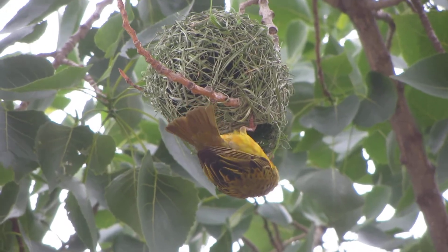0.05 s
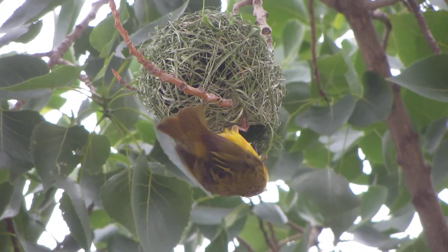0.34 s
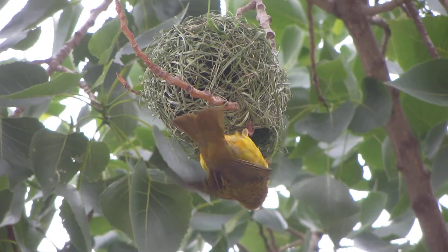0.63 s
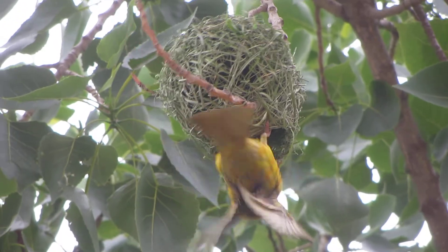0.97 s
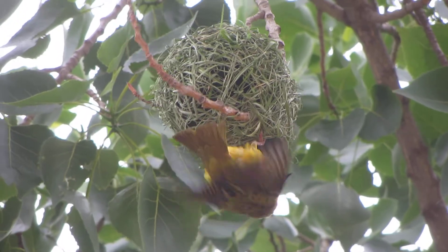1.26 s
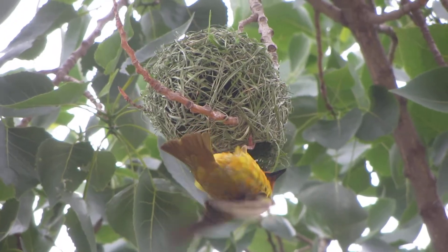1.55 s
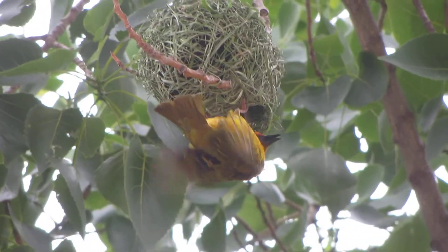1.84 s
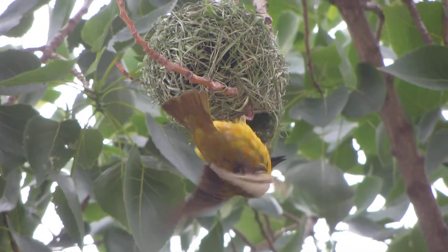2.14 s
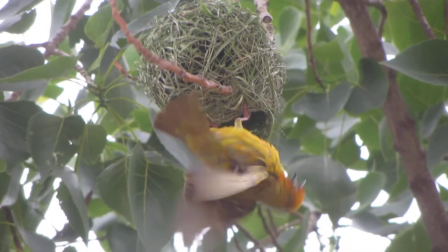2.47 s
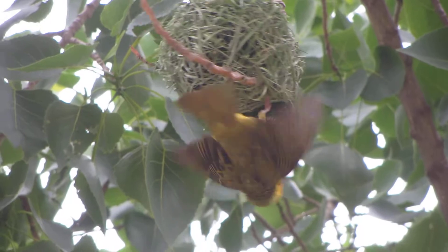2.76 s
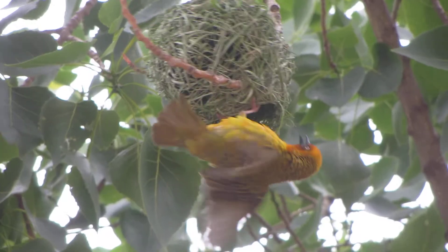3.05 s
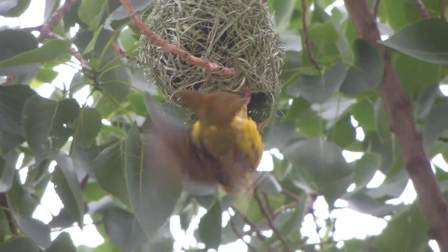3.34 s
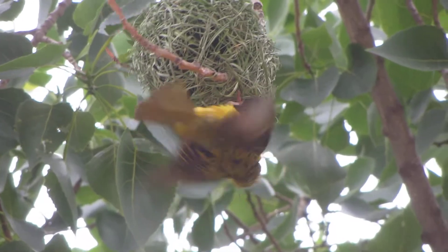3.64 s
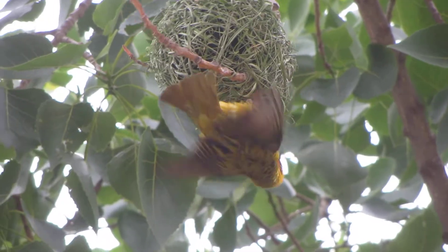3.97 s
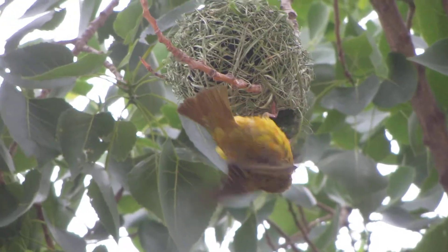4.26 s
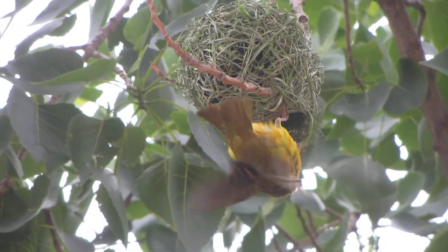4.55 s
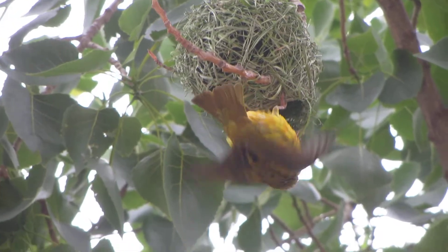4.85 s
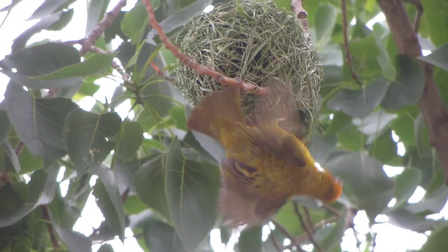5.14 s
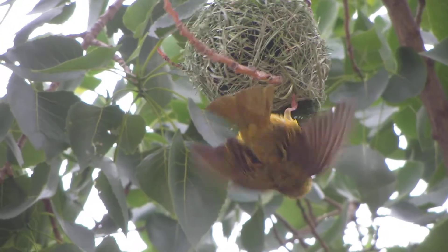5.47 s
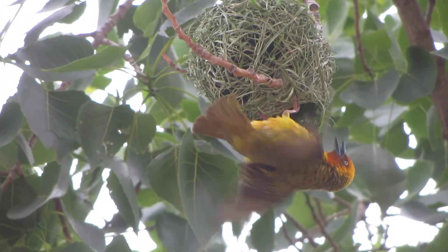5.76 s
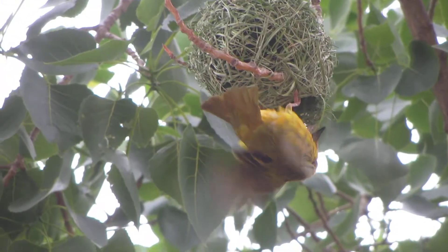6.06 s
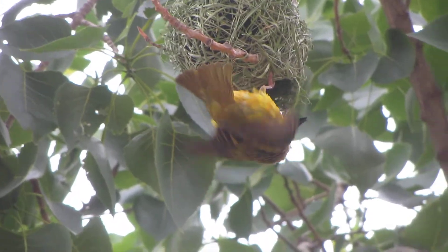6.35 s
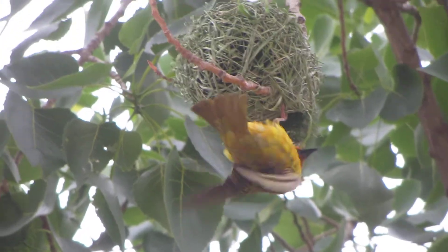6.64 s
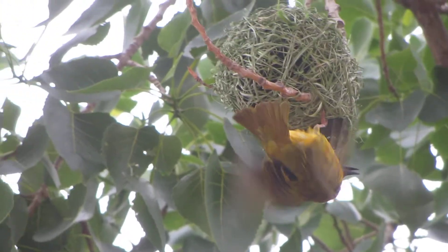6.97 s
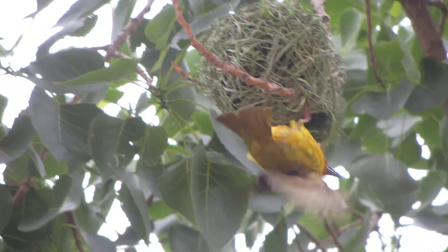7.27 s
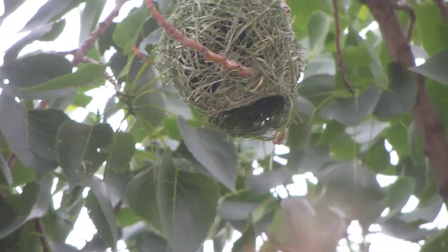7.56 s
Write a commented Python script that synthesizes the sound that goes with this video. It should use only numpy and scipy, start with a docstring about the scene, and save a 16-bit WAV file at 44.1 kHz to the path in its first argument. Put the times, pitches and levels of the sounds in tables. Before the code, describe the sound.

Outdoors, a steady rush carries an idling engine and a mains hum off to the right. In front and a little left, a small bird flutters its wings under its nest and sings: buzzes snapping into sharp chips, falling whistles, then a quieter sizzling twitter, more chips and whistles, and finally a string of short rasping chirps. The surrounding foliage scatters each call into brief echoes.

```python
"""First comes a steady outdoor rush, with an engine idling over a mains hum off to the right.
Almost at once a weaver bird joins in, fluttering its wings under its nest in a leafy tree.
Its voice box (the syrinx) makes buzzes that lead into sharp chips, long falling whistles,
a sizzling twitter and rasping chirps. The leaves scatter it all into quick echoes."""
import sys
import numpy as np
from scipy import signal
from scipy.fft import rfft, irfft
from scipy.io import wavfile

SR = 44100
rng = np.random.default_rng(int(sys.argv[2]) if len(sys.argv) > 2 else 0)


def digitize_waveform(pressure):
    """Quantize a signal to 16-bit integers and store it at the path in sys.argv[1].

    Rows of a 2-D input are taken as channels; values are limited to [-1, 1].
    """
    field = np.atleast_2d(pressure).T
    bounded = np.clip(field, -1, 1)
    quanta = np.round(bounded * 32767).astype(np.int16)
    wavfile.write(sys.argv[1], SR, quanta)


N = 340011
TIME = np.arange(N) / SR
HZ = np.maximum(np.arange(N // 2 + 1) * SR / N, 1)
LEFT_LAG_S = 0.00015   # sound from the right reaches the left side this much later


def from_db(db):
    """Turn decibels into a number to multiply by."""
    return 10 ** (np.asarray(db) / 20)


def rms_one(x):
    """Scale a sound to a power of 1."""
    return x / np.sqrt(np.mean(x ** 2) + 1e-20)


def at_hz(points):
    """Join a table's points to get a value at every frequency."""
    hz, value = np.transpose(points)
    return np.interp(np.log(HZ), np.log(hz), value)


def drift(rate, size=N):
    """A random wobble of about 1 either way, changing course `rate` times a second."""
    knots = rng.standard_normal(4096)
    return np.interp(np.arange(size) / SR * rate, np.arange(len(knots)), knots) * np.sqrt(3 / 2)


def turn(hz):
    """The phase of a wave: how far it has turned as its pitch moves."""
    return 2 * np.pi * np.cumsum(hz) / SR


def add(track, start, sound):
    """Mix a sound in at its start time."""
    i = max(round(start * SR), 0)
    track[i:i + len(sound)] += sound[:N - i]


# Tone colour of the low and high parts of the rush: f/Hz, relative level/dB
RUSH_LOW = [(35, -31), (65, -6.5), (90, 1.5), (125, 3), (175, -5.5), (270, -2.5), (360, -2.5), (550, -7),
            (630, 1), (720, -2.5), (880, 2.5), (1150, -1), (1310, 1.5), (1600, -0.5)]
RUSH_HIGH = [(1500, -3), (1800, 3.5), (2100, -6), (2300, -2), (2450, -7.5), (2800, -3.5), (3400, -6.5),
             (4100, -12), (5200, -8.5), (6500, -12), (7600, -12.5), (10000, -24), (11300, -26),
             (13800, -25), (15500, -38)]
# How much louder the rush is on the left: f/Hz, left minus right level/dB
RUSH_BALANCE = [(100, -1), (700, -1), (1300, 1.5), (2400, -2.5), (4400, 0.5), (8000, -5), (15000, -0.5)]
# How much of the rush comes from the right: f/Hz, share from 0 to 1
RUSH_FROM_RIGHT = [(100, 0.91), (700, 0.93), (1700, 0.82), (2700, 0.094), (4100, 0.56), (7000, 0.47),
                   (10000, 0.1), (13000, 0.11)]
def rush(rumble_db=-28, hiss_db=-31, crossover_hz=1650):
    """Steady outdoor noise, partly from the right and partly from all around."""
    low = 1 / np.sqrt(1 + (HZ / crossover_hz) ** 16)
    rumble = from_db(rumble_db) * rms_one(low * from_db(at_hz(RUSH_LOW)))
    hiss = from_db(hiss_db) * rms_one(np.sqrt(1 - low ** 2) * from_db(at_hz(RUSH_HIGH)))
    gain = np.hypot(rumble, hiss) * from_db(at_hz(RUSH_BALANCE) * [[.5], [-.5]])
    share = at_hz(RUSH_FROM_RIGHT)
    noise = rfft(rng.standard_normal((3, N)))
    one_sided = noise[0] * np.exp(-2j * np.pi * HZ * LEFT_LAG_S * np.array([[1], [0]]))
    return irfft(gain * (np.sqrt(share) * one_sided + np.sqrt(1 - share) * noise[1:]), N)


# Narrow bands of very high hiss: f/Hz, width/Hz, relative level/dB
TREBLE_BANDS = [(9580, 580, -46), (10500, 120, -55)]
def treble(level_db=-1, flicker_db=3):
    """A faint hiss flickers high above the song."""
    gain = sum(from_db(db) * rms_one(np.exp(-((HZ - hz) / width) ** 2)) for hz, width, db in TREBLE_BANDS)
    hiss = irfft(gain * rfft(rng.standard_normal((2, N))), N)
    return hiss * from_db(level_db + flicker_db * drift(30))


# The engine's tones: multiple of its cycle rate, level/dB
ENGINE_TONES = [(2, -56), (4, -42), (6, -38.5), (8, -38.5), (9, -47), (10, -45.5), (11, -51.5), (12, -44.5),
                (13, -50), (14, -46), (16, -46), (17, -49.5), (18, -48), (19, -48.5), (20, -52), (22, -48),
                (24, -49.5), (30, -51), (34, -48.5), (36, -39), (38, -45.5), (40, -46), (42, -59),
                (44, -51), (48, -44.5)]
# Steady humming tones: f/Hz, level/dB
HUM_TONES = [(54.5, -53), (92.5, -53), (100.1, -34), (123, -46.5), (127.5, -43), (135, -54), (143, -46.5),
             (200.2, -41.5)]
def machines(cycle_hz=21.665, wander=0.000615, waver_db=1.0):
    """An idling engine's tones all follow its speed; the hum throbs against them, off to the right."""
    cycle = turn(cycle_hz * (1 + wander * drift(2.02)))
    tones = [(round(multiple) * cycle, db) for multiple, db in ENGINE_TONES]
    tones += [(2 * np.pi * hz * TIME, db) for hz, db in HUM_TONES]
    drone = np.zeros(N)
    for phase, db in tones:
        loud = np.sqrt(2) * from_db(db + waver_db * drift(5))
        drone += loud * np.sin(phase + 2 * np.pi * rng.random())
    late = np.interp(TIME - LEFT_LAG_S, TIME, drone)
    return np.array([late, drone]) * from_db([[-.4], [.4]])


def foliage(sound, near_db=-2, far_db=-19, near_fade_s=.135, far_fade_s=.5, alike=0.48):
    """Leaves and branches return a quick spray of echoes; a faint tail comes from farther off."""
    t = np.arange(SR // 2) / SR
    arrives = (rng.random((3, len(t))) < 3000 / SR) & (t > .003)   # about 3000 a second, after 3 ms
    echoes = rng.standard_normal((3, len(t))) * arrives
    echoes = np.sqrt(alike) * echoes[0] + np.sqrt(1 - alike) * echoes[1:]   # both sides share some
    near = rms_one(echoes * from_db(-60 * t / near_fade_s))
    far = rms_one(rng.standard_normal((2, len(t))) * from_db(-60 * t / far_fade_s))
    response = (from_db(near_db) * near + from_db(far_db) * far) / np.sqrt(len(t))
    return signal.fftconvolve(sound[None], response, axes=1)[:, :N]


# Stronger brushes of the feathers: t/s, length/s, level/dB
WING_BRUSHES = [(.335, 0.057, -38), (0.42, .05, -37), (2.215, 0.042, -40), (4.089, 0.044, -34),
                (6.089, 0.024, -34.5), (6.26, .042, -31.5), (7.528, .057, -33)]
# Tone colour of the feathers: f/Hz, relative level/dB
FEATHER_COLOUR = [(600, -48), (2000, 12.5), (4000, -2), (7000, 7.5), (10000, -4), (12000, -6.5),
                  (15000, -20)]
def wings(flutter_db=-47, spread_db=4, grain_db=3):
    """Feathers swish unevenly all along, with a few stronger brushes."""
    loud = from_db(flutter_db + spread_db * drift(22))
    for start, length, db in WING_BRUSHES:
        add(loud, start, from_db(db) * np.hanning(round(length * SR)))
    grain = from_db(grain_db * drift(450))
    swish = irfft(rfft(rng.standard_normal(N)) * from_db(at_hz(FEATHER_COLOUR)), N)
    return loud * grain * rms_one(swish)


def course(shape, length, top_hz, bottom_hz, bend=1):
    """Pitch and loudness along one note; pitch height 1 means top_hz and 0 means bottom_hz."""
    progress = np.linspace(0, 1, round(length * SR))
    at, height, db = np.transpose(shape)
    pitch = bottom_hz + (top_hz - bottom_hz) * np.interp(progress, at, height) ** bend
    loud = np.sqrt(2) * from_db(np.interp(progress, at, db))
    return pitch, loud * signal.windows.tukey(len(progress), .1)


def tone(pitch, second_db, third_db, jitter=.022):
    """The voice box sings a slightly shaky tone, with weak overtones at 2 and 3 times its pitch."""
    phase = turn(pitch * (1 + jitter * drift(900, size=len(pitch))))
    return np.sin(phase) + from_db(second_db) * np.sin(2 * phase) + from_db(third_db) * np.sin(3 * phase)


def note(length, start_hz, end_hz, db, octave_db=-15):
    """A thin, straight note that swells and fades."""
    pitch = np.linspace(start_hz, end_hz, round(length * SR))
    loud = np.sqrt(2) * from_db(db) * signal.windows.tukey(len(pitch), .6)
    return loud * tone(pitch, second_db=octave_db, third_db=-33)


def sizzle(length, hz, width_hz, db):
    """A toneless part of the song: one band of hiss that swells and fades."""
    band = signal.butter(2, [hz - width_hz / 2, hz + width_hz / 2], "band", fs=SR, output="sos")
    hiss = rms_one(signal.sosfilt(band, rng.standard_normal(SR // 2)))[:round(length * SR)]
    return from_db(db) * hiss * signal.windows.tukey(len(hiss), .6)


# Lone peeps: t/s, length/s, start f/Hz, end f/Hz, level/dB
LONE_PEEPS = [(0.01, .1, 4880, 4640, -41.5), (6.108, .016, 3770, 3260, -27), (6.112, 0.08, 4780, 4610, -38)]
def peeps():
    """A few thin notes sound on their own; the faint one near 6.1 s comes from a second bird farther off."""
    out = np.zeros(N)
    for start, length, start_hz, end_hz, db in LONE_PEEPS:
        add(out, start, note(length, start_hz, end_hz, db, octave_db=-18))
    return out


# Twitter calls: t/s, peep length/s, peep f/Hz, level/dB, closing slide length/s (0 for none)
TWITTER_CALLS = [(0.314, 0.041, 3570, -41, 0), (3.776, 0.051, 3690, -32, 0.065),
                 (3.973, 0.058, 3550, -33.5, 0.068), (4.183, 0.046, 3570, -33, 0.0517),
                 (4.409, 0.048, 3560, -33.5, 0.0017)]
def twitter():
    """A peep grows into a sizzle; a full call adds a lower note and a hissy downward slide."""
    out = np.zeros(N)
    for start, length, hz, db, slide_s in TWITTER_CALLS:
        add(out, start, note(length, hz * .99, hz * 1.01, db, octave_db=-9))
        add(out, start + .03, sizzle(length=.076, hz=6320, width_hz=2500, db=db + .5))
        if slide_s > 0:
            add(out, start + .069, note(length=.027, start_hz=3310, end_hz=3310, db=db - 3))
            slide_at = start + .095
            add(out, slide_at, note(slide_s, start_hz=4870, end_hz=4510, db=db + 2.5))
            add(out, slide_at, sizzle(slide_s, hz=5700, width_hz=1400, db=db + 4.5))
    return out


# Rasping chirps: t/s, length/s, top f/Hz, bottom f/Hz, level/dB,
# then, compared with the high voice: low voice level/dB, blend tone level/dB
RASP_CALLS = [(1.519, .04, 4900, 4180, -24.5, -22, -10), (1.777, .061, 5900, 5250, -23, -12, -9),
              (6.231, .046, 4990, 4280, -22, -30, -10), (6.406, .068, 5760, 5500, -20, -10.5, -9),
              (6.714, 0.042, 5000, 4210, -22, -14, -9), (6.911, .061, 5920, 5450, -23.5, -11.5, -8),
              (7.141, .041, 5300, 5210, -25, -31, -4), (7.324, 0.078, 6180, 5370, -25.5, -8.5, -6.5),
              (7.523, 0.064, 6080, 5470, -22.5, -7.5, -6)]
# Path of one rasp: share of its length, pitch height, relative level/dB
RASP_PATH = [(0, 0.843, -7), (.2, 0.925, -2.5), (.55, .4, -3.5), (1, 0.018, -5.5)]
def rasps(warble_hz=126, swing=0.097, swing_s=0.064, throb_s=.05, growth_s=0.0065, long_s=.055):
    """Both sides of the voice box sound: a pulsing high voice and a scratchy low one blend together."""
    out = np.zeros(N)
    for start, length, top_hz, bottom_hz, db, low_db, blend_db in RASP_CALLS:
        pitch, loud = course(RASP_PATH, length, top_hz, bottom_hz)
        t = np.arange(len(pitch)) / SR
        cycle = 2 * np.pi * warble_hz * t
        warble = swing * np.exp(-t / swing_s) * np.cos(cycle)
        high = turn(pitch * (1 - warble + 0.045 * drift(1528, size=len(t))))
        low_hz = np.linspace(2260, 2020, len(t))
        low = turn(low_hz * (1 + 0.015 * drift(627, size=len(t))))
        high_voice = np.sin(high) + from_db(-22) * np.sin(2 * high)
        low_voice = from_db(low_db) * (from_db(-4) * np.sin(low) + np.sin(2 * low))
        blend = from_db(blend_db) * np.sin(high + 0.86 * low)   # a tone above both voices
        scratch = from_db(low_db - 8) * rng.standard_normal(len(t))
        voice = high_voice + (1 - np.exp(-t / growth_s)) * (low_voice + blend + scratch)
        pulses = 1 + np.exp(-t / throb_s) * np.sin(cycle - np.pi / 8)   # one per upswing, slowly merging
        add(out, start, from_db(db) * loud * pulses * voice)
        if length > long_s:   # a long rasp ends on a clear note
            add(out, start + length, note(.025, start_hz=4810, end_hz=4810, db=db - 9, octave_db=-13))
    return out


# Falling whistles: t/s, length/s, bend (higher falls sooner), level/dB
WHISTLE_CALLS = [(0.816, .19, 1.26, -27.5), (2.469, 0.21, 1.05, -25.5), (2.919, .2, 0.7, -24.5),
                 (3.363, .2, .88, -27), (4.993, .168, 1.1, -26.5), (5.448, .18, 1.2, -25.5)]
# Path of one whistle: share of its length, pitch height, relative level/dB
WHISTLE_PATH = [(0, 1, -16), (.11, .9, 0), (.3, .56, -1), (.55, .23, -1), (.8, .05, -1), (1, 0, -9)]
def whistles(flutter_hz=335, swing_hz=260, flutter_depth=0.27, unevenness=0.207):
    """Long notes fall quickly, then level out; a fast, uneven flutter shakes pitch and loudness."""
    out = np.zeros(N)
    for start, length, bend, db in WHISTLE_CALLS:
        pitch, loud = course(WHISTLE_PATH, length, top_hz=5224, bottom_hz=3353, bend=bend)
        flutter = np.sin(turn(flutter_hz * (1 + unevenness * drift(200, size=len(pitch)))))
        voice = tone(pitch + swing_hz * flutter, second_db=-18.5, third_db=-32)
        add(out, start, from_db(db) * loud * (1 + flutter_depth * flutter) * voice)
    return out


# The two bands where a buzz rings: f/Hz, width/Hz, relative level/dB
BUZZ_RINGS = [(5050, 730, 0.6), (2970, 1000, -1)]
def buzz(length, db, ticks_per_s=121, tick_s=.0025):
    """A fast run of dry ticks, each a tiny burst of hiss."""
    hiss = sum(sizzle(length, hz, width_hz, db + band_db) for hz, width_hz, band_db in BUZZ_RINGS)
    since_tick = np.arange(len(hiss)) / SR % (1 / ticks_per_s)
    return hiss * rms_one(np.exp(-since_tick / tick_s))


# Sharp chips: t/s, length/s, top f/Hz, level/dB, buzz head start/s, buzz level/dB
CHIP_CALLS = [(0.714, .031, 5680, -24.5, 0.057, -40), (1.179, .025, 6320, -14.5, 0.12, -37.5),
              (2.157, 0.024, 5930, -18, 0.063, -40), (2.38, 0.02, 6040, -15.5, 0.059, -41),
              (2.839, .025, 6250, -12, 0.12, -37), (3.283, 0.025, 6200, -11, 0.092, -35),
              (3.708, .025, 6220, -10.5, .09, -35), (4.853, .023, 6300, -14.5, 0.048, -36),
              (5.344, 0.032, 6130, -16, 0.14, -37), (5.821, 0.035, 6220, -17, 0.046, -36)]
# Path of one chip: share of its length, pitch height, relative level/dB
CHIP_PATH = [(0, 0.9, -16), (.35, 0.63, -5.5), (.65, 0.19, -4.5), (1, 0.15, -20.5)]
def chips(bottom_ratio=.745, overlap_s=0.028, lead_s=0.018, catch_early_s=0.0051):
    """A buzz, a soft lead-in note and a lower scratchy catch run into a steep downward sweep."""
    out = np.zeros(N)
    for start, length, top_hz, db, buzz_s, buzz_db in CHIP_CALLS:
        add(out, start - buzz_s, buzz(buzz_s + overlap_s, buzz_db))
        lead_db = -19.5 + 0.37 * db   # a louder chip gets a slightly louder lead-in
        pitch, loud = course(CHIP_PATH, lead_s, top_hz=4150, bottom_hz=3450)
        lead = loud * tone(pitch, second_db=-15, third_db=-20, jitter=0.035)
        add(out, start - lead_s, from_db(lead_db) * lead)
        pitch, loud = course(CHIP_PATH, length=0.0154, top_hz=3100, bottom_hz=2450)
        catch = loud * tone(pitch, second_db=-15, third_db=-15, jitter=0.055)
        add(out, start - catch_early_s, from_db(lead_db - 3) * catch)
        pitch, loud = course(CHIP_PATH, length, top_hz, bottom_ratio * top_hz)
        sweep = loud * tone(pitch, second_db=-28.5, third_db=-27, jitter=0.029)
        add(out, start, from_db(db) * sweep)
    return out


def scene(voice_db=0.7, beak_cut_hz=11000):
    """The steady background, with the bird in front and a little to the left."""
    background = rush() + treble() + machines()
    voice = from_db(voice_db) * (peeps() + twitter() + rasps() + whistles() + chips())
    beak = signal.butter(2, beak_cut_hz, fs=SR, output="sos")   # throat and beak soften the overtones
    bird = wings() + signal.sosfilt(beak, voice)
    return background + foliage(bird) * from_db([[.5], [-.5]]) + bird * from_db([[1.6], [-1.6]])


def record(dry, cutoff_hz=15800):
    """The very highest sounds are cut off steeply."""
    return signal.sosfilt(signal.ellip(12, .1, 90, cutoff_hz, fs=SR, output="sos"), dry)


dry = scene()
out = record(dry)
digitize_waveform(out)
```